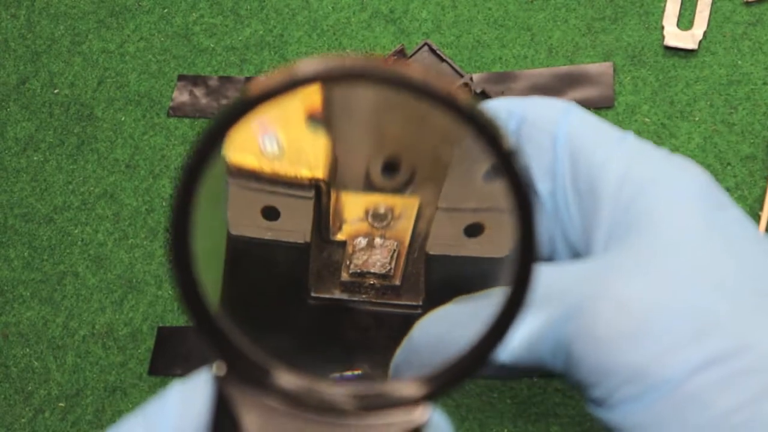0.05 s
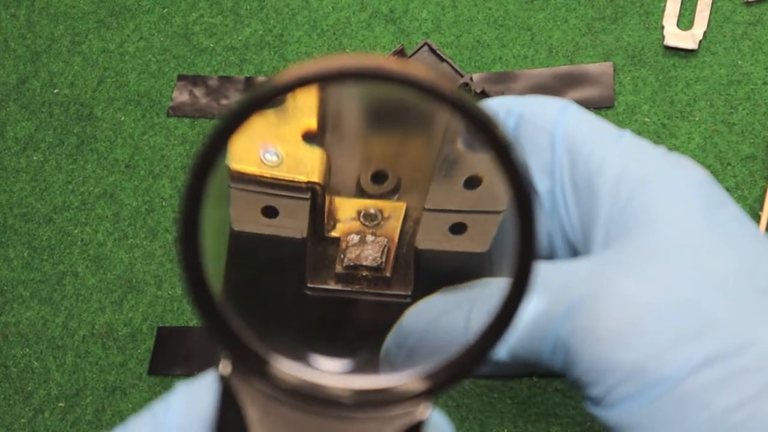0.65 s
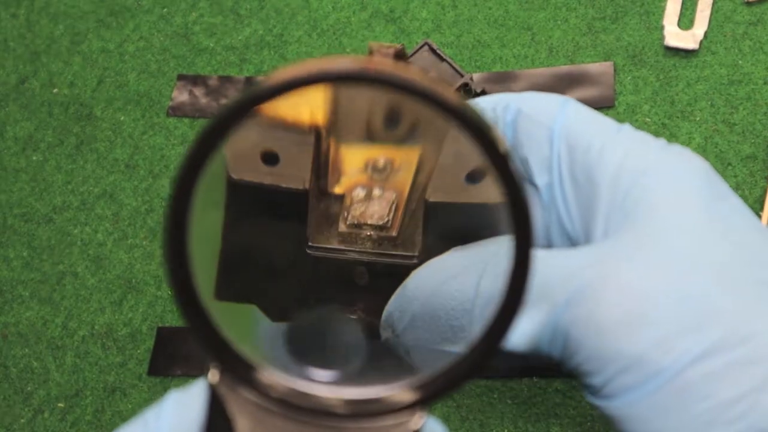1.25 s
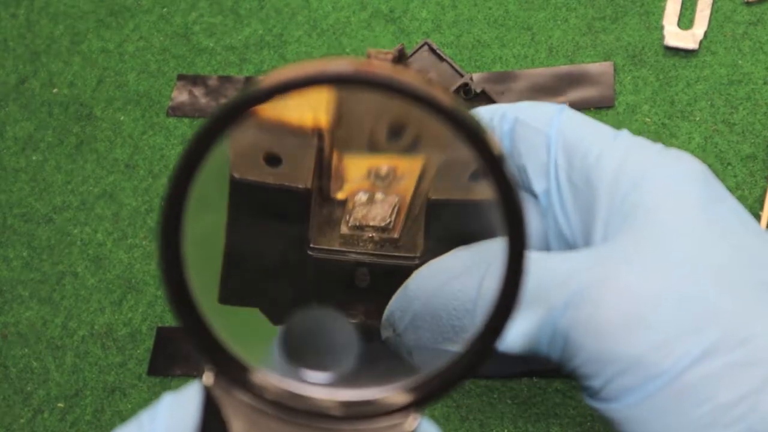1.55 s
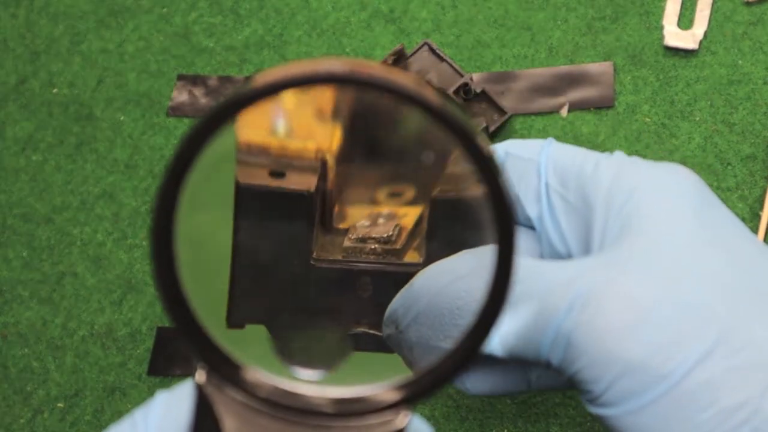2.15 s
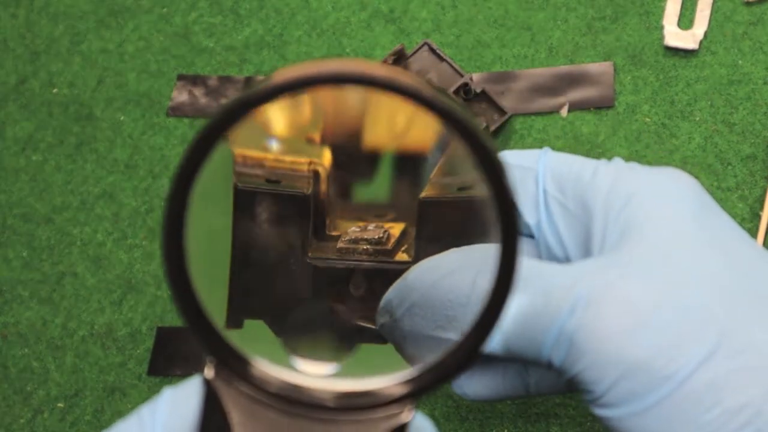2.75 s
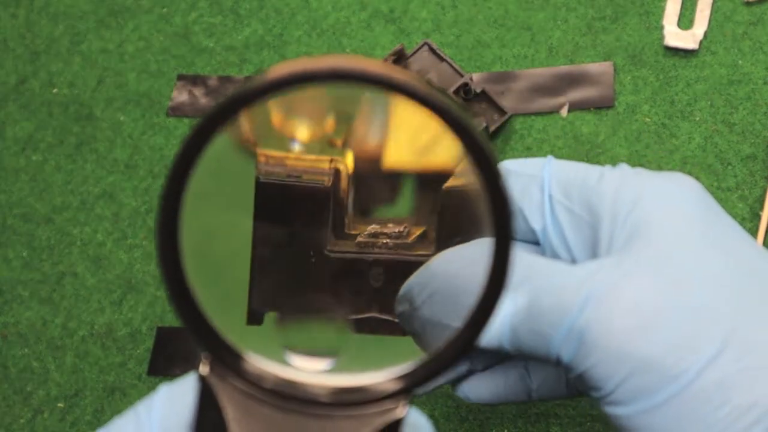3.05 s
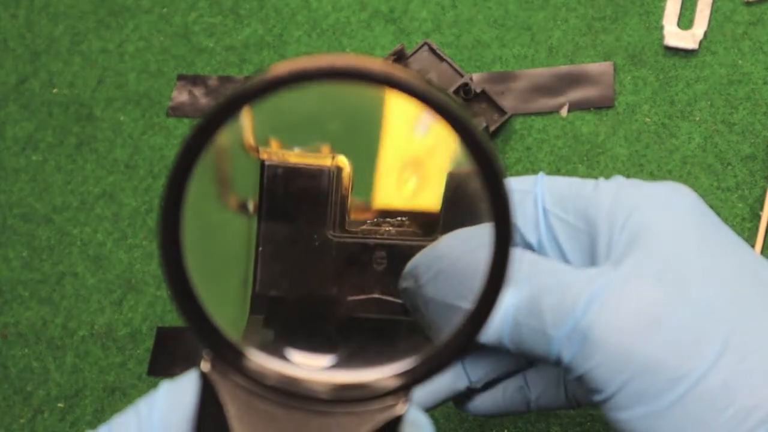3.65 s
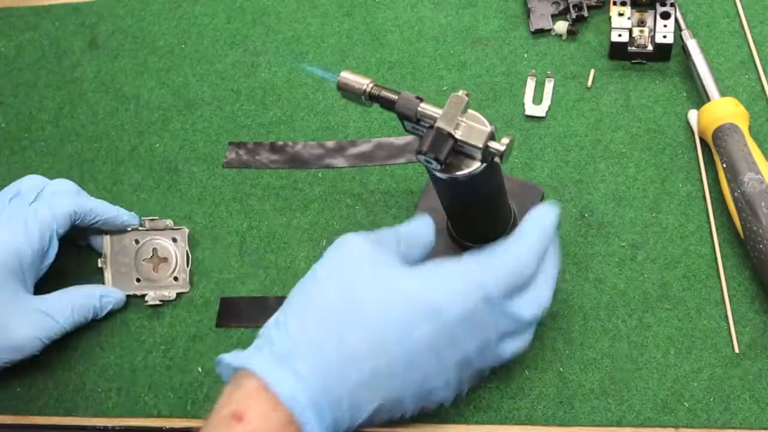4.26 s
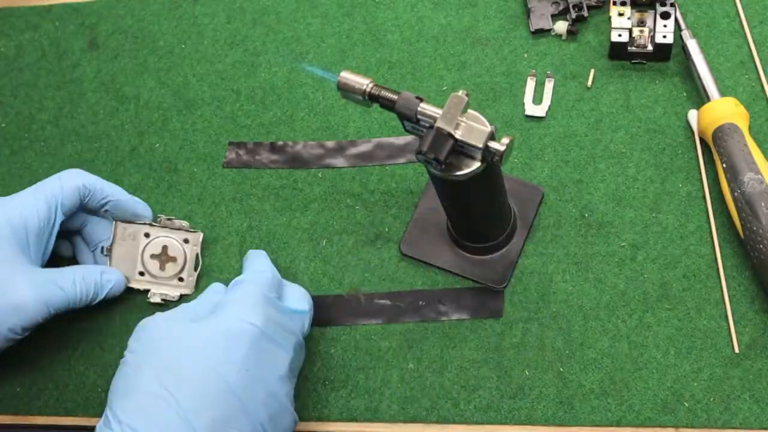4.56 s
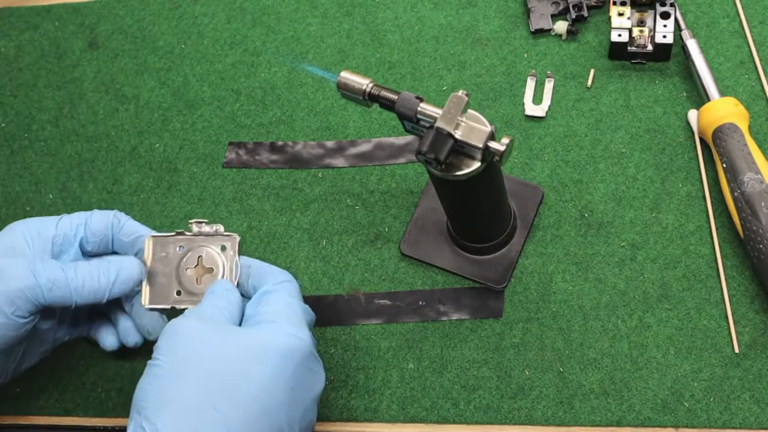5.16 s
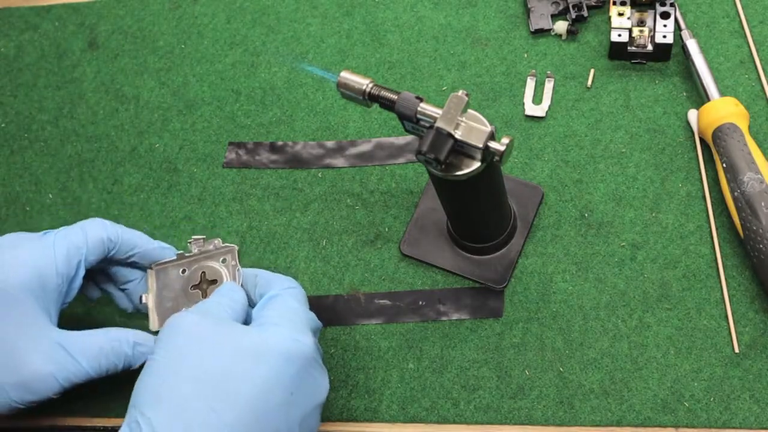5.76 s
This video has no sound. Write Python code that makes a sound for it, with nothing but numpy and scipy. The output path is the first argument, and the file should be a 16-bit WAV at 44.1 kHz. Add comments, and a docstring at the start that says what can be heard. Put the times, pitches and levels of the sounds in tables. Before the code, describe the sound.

A low machine hum with small dry ticks, then a small gas torch burns close by with a steady hiss and hollow roar.

```python
"""A workbench in a quiet workshop, heard from close by on a stereo pair of microphones.
At first a machine hums somewhere over a soft hiss, with small dry ticks close to the microphones, like
a lens stepping its focus. A glove rubs once over a small part. Near 4.2 s the level dips briefly. Then
a small butane torch burns on the bench, tapped softly as the hand lets go: its turbulent gas jet rings
flame, burner tube and bench, a steady hiss over a hollow roar."""
import sys
import numpy as np
from scipy import signal
from scipy.fft import rfft, irfft, next_fast_len
from scipy.io import wavfile

SR = 44100
rng = np.random.default_rng(int(sys.argv[2]) if len(sys.argv) > 2 else 0)


def wav_record(signal):
    """Record a signal, one row per channel, as 16-bit PCM in the file named by sys.argv[1]."""
    frames = np.transpose(np.atleast_2d(signal))
    bounded = np.clip(frames, -1, 1)
    # unit amplitude maps onto the largest positive 16-bit level
    quanta = np.round(bounded * 32767).astype(np.int16)
    wavfile.write(sys.argv[1], SR, quanta)


N = 264908
TIME = np.arange(N) / SR
PADDED = next_fast_len(N, real=True)
FREQ = np.maximum(np.arange(PADDED // 2 + 1) * SR / PADDED, 1)
TORCH_START_S = 4.285


# smooth spectrum of the gas jet at the microphones: frequency_hz, left_db, right_db
JET_SPECTRUM = [(30, -22, -26), (50, -22, -18), (84, -9.5, -10), (150, -8.5, -7.5), (227, -2, -2),
                (303, -2, -1.5), (530, -9, -9.5), (980, -9.5, -12), (1970, -18.5, -17.5),
                (3340, -20.5, -25), (6260, -26.5, -26), (9000, -25, -29), (13000, -24, -23),
                (14300, -50, -50)]
# resonances and hollows of flame, tube and bench: centre_hz, width_hz, left_boost_db, right_boost_db
TORCH_RESONANCES = [(300.5, 20, 5, 3), (333.3, 46, 13, 12.5), (402.3, 43, 11.5, 9.5), (437, 35, 6.5, 6),
                    (483, 20, -3, -2), (604, 65, 1, 4.5), (810, 37, -3, 0), (875, 82, 2.5, 2.5),
                    (1169, 207, 6.5, 4.5), (1346, 44, -6, -4), (1413, 73, 9.5, 3), (1604, 36, -3, -4),
                    (1665, 95, 1, 7), (1800, 73, -6, -5), (1880, 67, 3, -0.5), (2070, 60, 0, 2),
                    (2180, 90, 1, 3), (2510, 147, 7, 9), (2650, 96, 5, 5), (2800, 80, 4.5, 6),
                    (2970, 120, 3, 9.5), (3030, 93, 2, 4), (3380, 90, 4, -2), (3560, 90, 0, 5),
                    (3670, 80, 6, 0), (3900, 70, 4, -6), (4000, 140, 3.5, 2), (4170, 160, -2, -1),
                    (4600, 130, -1.5, -4), (4790, 110, 11, 5), (4960, 146, 6.5, 9.5), (5080, 120, 11, 1.5),
                    (5170, 80, 2, 6), (5230, 100, 7, -2), (6250, 510, 0, 0.5), (7270, 320, 4, 1.5),
                    (8020, 300, 2, 5), (8360, 340, 7, 0), (8650, 350, -1, 0), (9160, 200, 5, -3),
                    (9400, 250, 0, -3), (9700, 220, 5.5, 0), (10220, 300, 7.5, 2), (10560, 200, 11, 9),
                    (10770, 200, 6, -1), (11600, 510, -4, -5), (12340, 220, 2, 2), (12700, 170, 4, 1),
                    (13000, 260, 2.5, 3)]
# the torch across the pair: frequency_hz, left_right_likeness, right_lead_rad
JET_IMAGE = [(90, .9999, 0), (150, .999, 0), (290, .99, 0), (400, .95, .15), (520, .76, 0), (800, .72, -.3),
             (1150, .85, -.1), (1500, .58, .7), (1900, .42, -1.4), (2600, .62, -1.2), (3500, .45, -1.9),
             (5000, .55, .8), (6000, .35, -2.7), (7400, .55, -1.5), (11200, .55, -3.6), (12000, .55, -5.7),
             (13400, .87, -6.2)]
def gas_jet():
    """Turbulence rings flame, burner tube and bench, and reaches each microphone by its own path."""
    colour_db = in_frequency(JET_SPECTRUM) + reflections(spread_s=0.012, ripple_db=1.26)
    for hz, width, left_db, right_db in TORCH_RESONANCES:
        near = np.abs(FREQ - hz) < 2 * width
        peak = np.exp(-(2 * (FREQ[near] - hz) / width) ** 2)
        colour_db[:, near] += np.outer([left_db, right_db], peak)
    likeness, lead = in_frequency(JET_IMAGE)
    path_phase = np.array([np.ones_like(lead), np.exp(1j * lead)])
    return filtered(stereo_noise(colour_db, likeness), path_phase)


def torch(flame_db=-29, growth_db_per_s=0.13, split_hz=900, whistle_hz=4940, whistle_half_width_hz=320):
    """The torch on the bench, valve open: a steady roar, a fluttering hiss, a breathy nozzle whistle."""
    jet = gas_jet()
    roar = filtered(jet, 1 / (1 + (FREQ / split_hz) ** 4))
    hiss = hand_echo(jet - roar)
    flutter_db, sputter_db = 0.5 * drift(45), 0.6 * drift(160)
    hiss *= from_db(flutter_db + sputter_db)
    whistle = filtered(hiss, np.exp(-((FREQ - whistle_hz) / whistle_half_width_hz) ** 4))
    burn_s = TIME - TORCH_START_S
    firming = from_db(-1.3 + 2 * burn_s)   # the whistle gains on the hiss by 2 dB a second
    return (roar + (hiss - whistle) + firming * whistle) * from_db(flame_db + growth_db_per_s * burn_s)


def reflections(spread_s, ripple_db, corner_hz=1500):
    """Many short paths off bench and tools ripple the spectrum at the microphones; in dB."""
    fade = np.exp(-np.minimum(TIME / spread_s, 20))
    paths = rng.standard_normal(N) * fade * (1 - fade)
    scattered = FREQ ** 2 / (FREQ ** 2 + corner_hz ** 2)   # long waves pass small things by
    return ripple_db * scattered * rms_one(rfft(paths, PADDED).real)


def hand_echo(x, echo_db=-17.5, delay_s=0.000792, sway_s=0.00017):
    """Moving hands near the torch add a faint echo; its path sways, so the colour shifts slowly."""
    sent_s = TIME - delay_s - sway_s * drift(0.78)
    return x + from_db(echo_db) * np.array([np.interp(sent_s, TIME, channel) for channel in x])


# taps on the torch body: start_s, level_db, centre_hz
TORCH_TAPS = [(4.313, -37, 2340), (4.35, -33.5, 2750), (4.357, -37, 2750)]
def torch_taps(rise_s=0.0013, octaves=0.39):
    """The hand lets go of the torch; each soft contact is a short burst of noise."""
    return sum(from_db(db) * strike(s, rise_s) * stereo_noise(hump_db(hz, octaves), likeness=0.5)
               for s, db, hz in TORCH_TAPS)


# small dry ticks close to the microphones, mostly in twos and threes: start_s, level_db
CLOSE_TICKS = [(0.132, -43), (0.176, -41), (0.223, -49), (0.376, -48), (0.5995, -46), (0.71, -46),
               (0.746, -41.5), (0.978, -43), (1.1863, -44), (1.2116, -44), (3.1154, -49), (3.167, -45),
               (3.2114, -44), (3.2485, -46.5), (4.1452, -44.5)]
# what every tick rings with: pitch_hz, relative_db, t60_s, right_lead_rad
TICK_MODES = [(1814, -8, 0.045, 1.1), (2000, -10.5, 0.04, 0.6), (2355, -3, 0.04, 2.1),
              (2460, -3, 0.035, 2.7), (2630, -6, 0.035, 2.7), (2850, -6, 0.03, 2.7),
              (4280, -12, 0.025, 2.7), (4540, -11, 0.025, 1.9)]
def close_ticks(contact_s=0.001, scatter_db=1.5):
    """Ticks like a lens stepping its focus: the same short modes ring, a little differently each time."""
    out, age = np.zeros((2, N)), TIME[:SR // 10]
    attack = 1 - np.exp(-age / contact_s)
    for s, db in CLOSE_TICKS:
        start = int(s * SR)
        for hz, mode_db, t60, lead in TICK_MODES:
            ring = attack * from_db(db + mode_db + scatter_db * rng.normal() - 60 * age / t60)
            phase = 2 * np.pi * (hz * age + rng.random())
            out[:, start:start + len(age)] += ring * np.sin([phase, phase + lead])
    return out


def glove_rub(centre_s=2.9, half_width_s=0.08, level_db=-66, grain_db=3.0):
    """Close by, a glove slides once over a small part: a soft, dull, grainy swell."""
    swell = np.exp(-((TIME - centre_s) / half_width_s) ** 2)
    friction = from_db(level_db + grain_db * drift(200))
    return swell * friction * stereo_noise(hump_db(hz=1600, octaves=0.62), likeness=0.8)


# slow swell of the main hum before the torch: time_s, level_db
HUM_SWELL = [(0.0, -35), (0.5, -34), (0.67, -36.5), (0.93, -32), (1.14, -36.5), (1.34, -36.0), (1.43, -33),
             (1.65, -35), (1.77, -33), (1.89, -34), (2.41, -34.5), (2.62, -33), (2.86, -37.5),
             (3.18, -34.0), (3.41, -36.0), (3.7, -32.5), (3.93, -36.5), (4.09, -34)]
# weaker steady tones in the room: pitch_hz, before_torch_db, with_torch_db
ROOM_TONES = [(57.9, -59, -44), (77.1, -56, -48), (178.3, -76.5, -46), (180, -60.5, -77),
              (306.3, -66.5, -77.5), (851, -74.5, -84)]
def machine_hum(burning, pitch_hz=136.8, with_torch_db=-37, wander_hz=0.12, waver_hz=0.26):
    """A machine somewhere in the room: one strong low tone just off centre, weaker ones around it."""
    swell_db, = in_time(HUM_SWELL)
    gain = from_db((1 - burning) * swell_db + burning * with_torch_db)
    out = gain * tone(pitch_hz + wander_hz * drift(1), pan_db=0.05, lead_rad=0.036)
    for hz, before_db, after_db in ROOM_TONES:
        gain = from_db((1 - burning) * before_db + burning * after_db)
        out += gain * tone(hz + waver_hz * drift(1.5))
    return out


# spectrum of the workshop air: frequency_hz, relative_db
AIR_SPECTRUM = [(20, -29), (35, -14), (47, -16.5), (58, -12), (68, -10), (80, -1.5), (91, -3.5),
                (105, -13.5), (128, -1.5), (150, -13.5), (170, -12), (215, -17.5), (255, -15.5), (295, -13),
                (325, -17), (450, -20), (620, -20), (1000, -22.5), (2600, -27.5), (7500, -39),
                (10500, -47.5), (12000, -47), (15500, -57)]
# the air across the pair: frequency_hz, left_right_likeness
AIR_IMAGE = [(50, .997), (85, .995), (108, .94), (130, .98), (165, .86), (215, .47), (250, .52), (295, .67),
             (345, .15), (420, -.1), (700, -.45), (2500, -.64), (12000, -.6), (13500, -.95)]
def workshop_air(level_db=-45, whine_hz=8050, whine_db=-85, waver_hz=5):
    """The room behind the bench: a centred low rumble under a wide, faint hiss and a thin whine."""
    whine = from_db(whine_db) * tone(whine_hz + waver_hz * drift(8), lead_rad=np.pi)
    return from_db(level_db) * stereo_noise(in_frequency(AIR_SPECTRUM), in_frequency(AIR_IMAGE)) + whine


def from_db(db):
    """Decibels to gain."""
    return 10 ** (np.asarray(db) / 20)


def rms_one(x):
    """Scale to unit power."""
    return x / np.sqrt(np.mean(x ** 2) + 1e-20)


def in_time(rows):
    """Each column of a curve at every sample."""
    s, *columns = np.transpose(rows)
    return np.array([np.interp(TIME, s, c) for c in columns])


def in_frequency(rows):
    """Each column of a spectrum at every bin, joined on a log axis."""
    hz, *columns = np.transpose(rows)
    return np.array([np.interp(np.log(FREQ), np.log(hz), c) for c in columns])


def filtered(x, response):
    """Pass a sound through a frequency response."""
    return irfft(rfft(x, PADDED) * response, PADDED)[..., :N]


def drift(rate_hz):
    """A random wander of rms 1, changing about `rate_hz` times a second."""
    return rms_one(filtered(rng.standard_normal(N), 1 / (1 + (FREQ / rate_hz) ** 2)))


def stereo_noise(colour_db, likeness):
    """Noise of rms 1 in a given colour; likeness runs from 1 (centred) to -1 (opposite phase)."""
    mid, side = rfft(rng.standard_normal((2, PADDED)))
    alike = np.clip(likeness, -1, 1)
    pair = np.sqrt(1 + alike) * mid + np.sqrt(1 - alike) * side * np.array([[1], [-1]])
    return rms_one(irfft(pair * from_db(colour_db), PADDED)[:, :N])


def tone(hz, pan_db=0, lead_rad=0):
    """A stereo sine of rms 1 on a pitch curve; left louder by `pan_db`, right ahead by `lead_rad`."""
    phase = 2 * np.pi * (np.cumsum(hz) / SR + rng.random())
    left = from_db(pan_db / 2) * np.sin(phase)
    right = from_db(-pan_db / 2) * np.sin(phase + lead_rad)
    return np.sqrt(2) * np.array([left, right])


def strike(start_s, rise_s):
    """A contact: rises to 1 in `rise_s`, then dies away."""
    age = np.clip((TIME - start_s) / rise_s, 0, 20)
    return age * np.exp(1 - age)


def hump_db(hz, octaves):
    """A broad spectral hump around `hz`; in dB."""
    return -20 * np.log10(1 + (np.log2(FREQ / hz) / octaves) ** 2)


def scene():
    """At the bench: the workshop throughout; ticks and a rub first, then the torch comes in at once."""
    burning = np.clip((TIME - TORCH_START_S) / 0.0011, 0, 1)
    room = machine_hum(burning) + workshop_air()
    return room + close_ticks() + glove_rub() + burning * torch() + torch_taps()


def record(dry, dip_s=4.213, dip_half_s=0.1, cutoff_hz=14400):
    """The level dips briefly to silence and returns; the highest treble is cut."""
    dip = np.minimum(np.abs(TIME - dip_s) / dip_half_s, 1)
    lowpass = signal.ellip(10, .1, 80, cutoff_hz, fs=SR, output="sos")
    return signal.sosfilt(lowpass, dry * dip)


dry = scene()
out = record(dry)
wav_record(out)
```